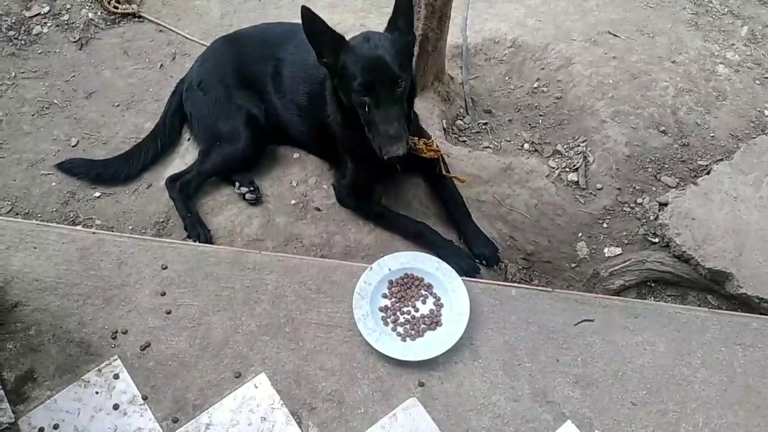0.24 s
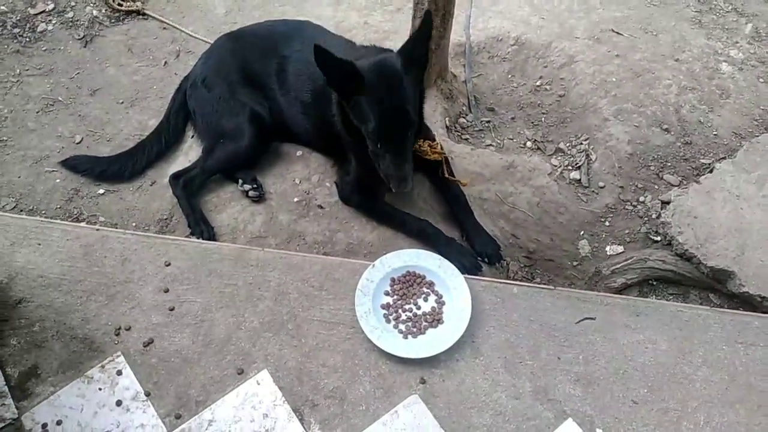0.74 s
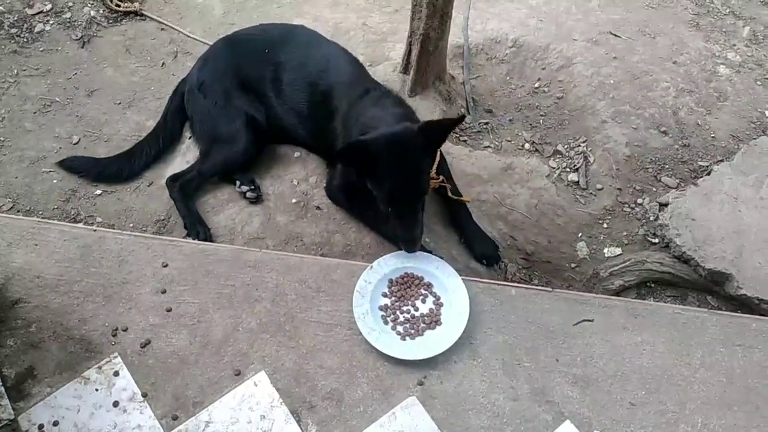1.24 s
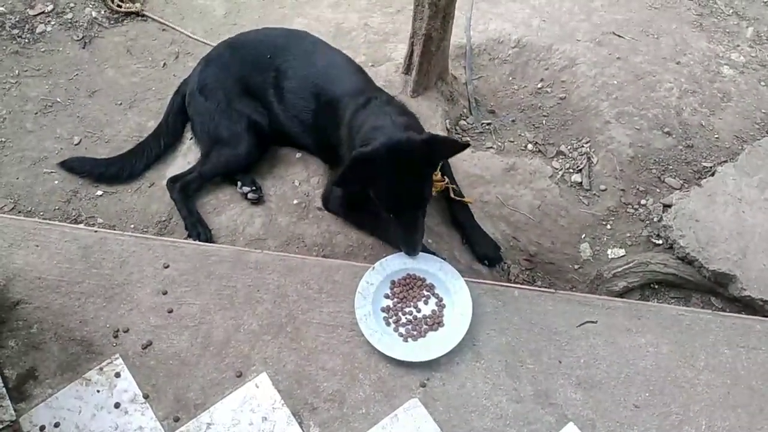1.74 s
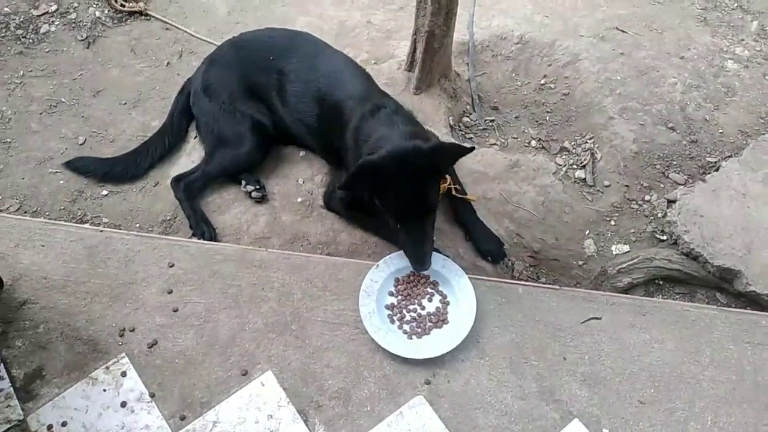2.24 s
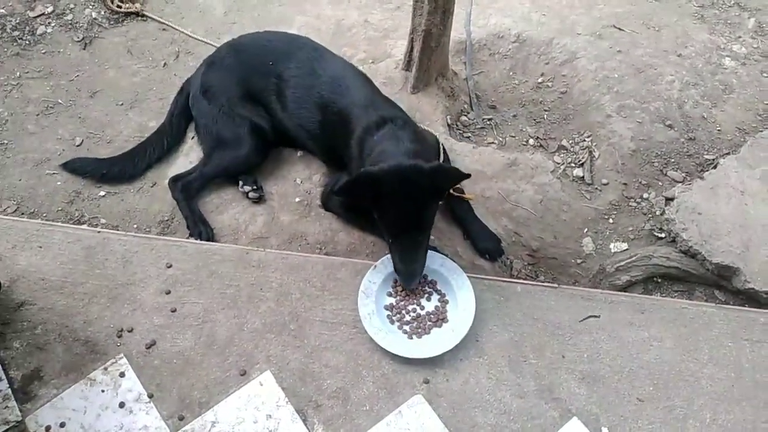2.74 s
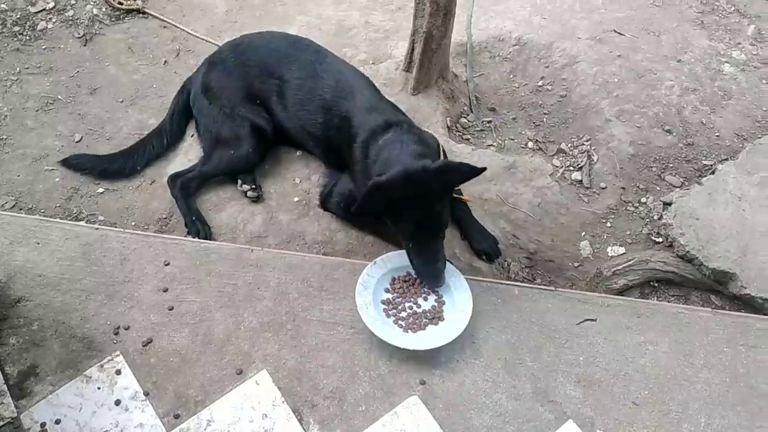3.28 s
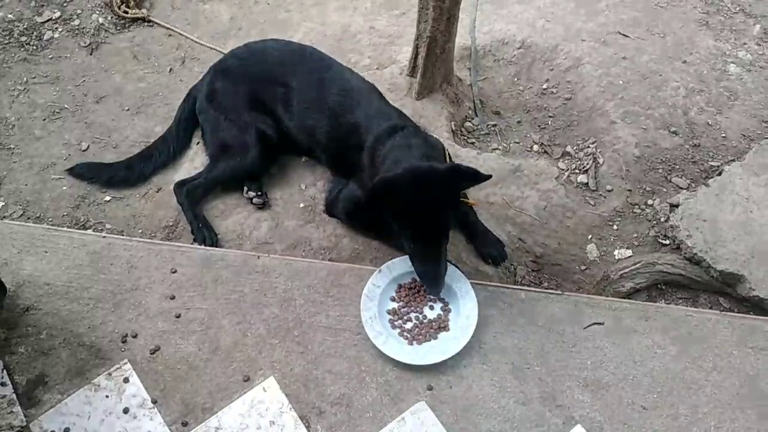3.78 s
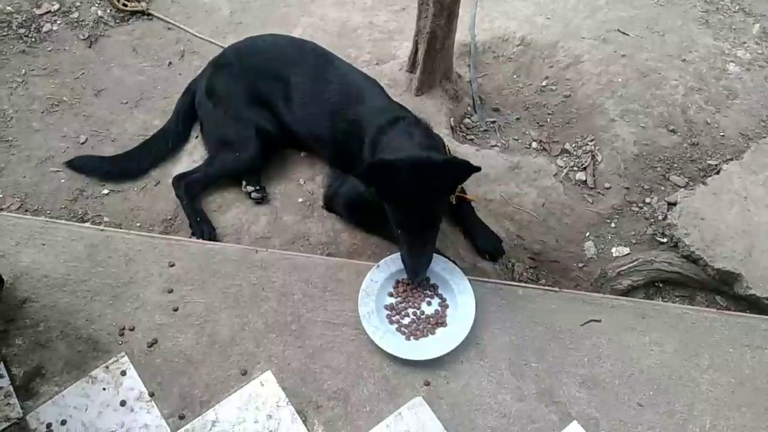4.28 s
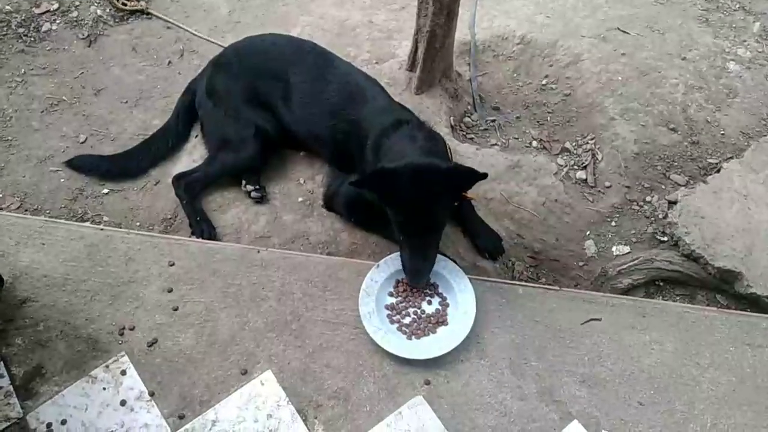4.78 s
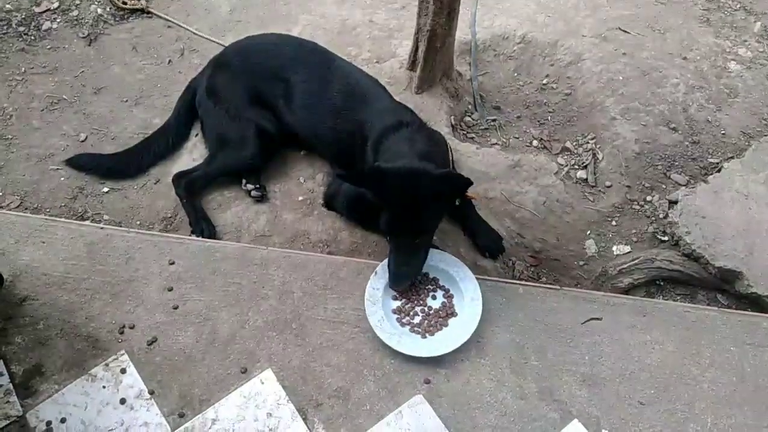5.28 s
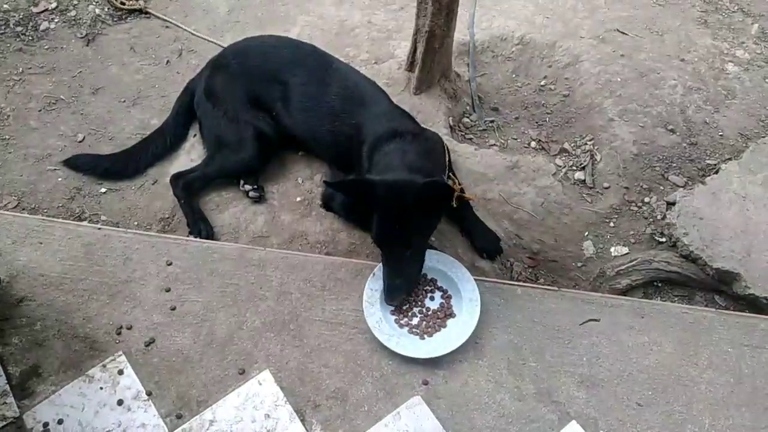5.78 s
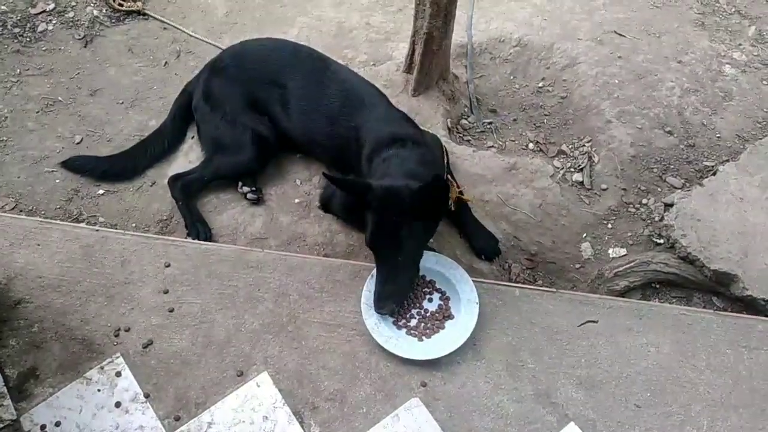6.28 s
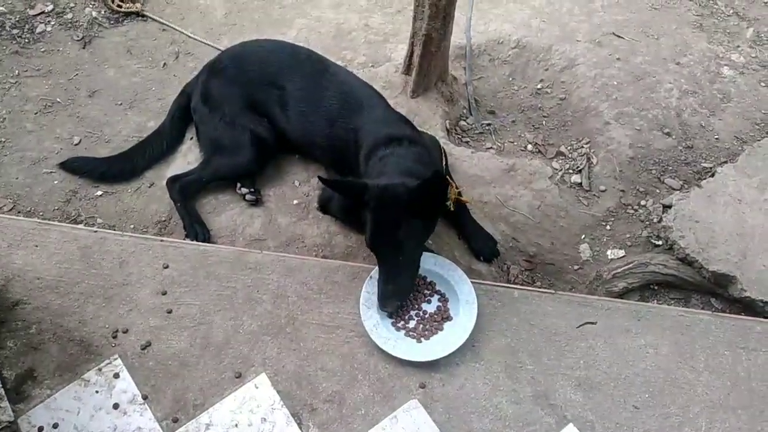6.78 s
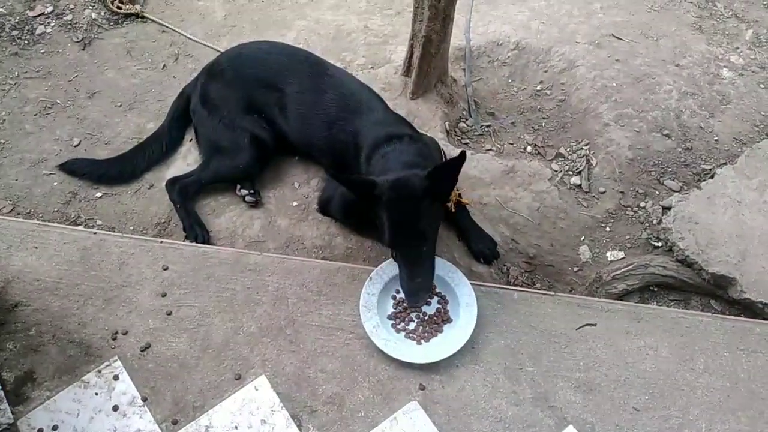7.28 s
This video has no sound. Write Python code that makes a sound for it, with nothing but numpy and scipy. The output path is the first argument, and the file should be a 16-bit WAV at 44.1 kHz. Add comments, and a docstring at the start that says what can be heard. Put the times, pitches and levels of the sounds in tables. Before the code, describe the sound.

A quiet outdoor porch with thin air hiss and soft, swelling low traffic rumble, heard in stereo from about two metres. From 0 to 2.5 s a dog makes faint sniffs and pellet rustles over a plate; a small steel clip tinkles very high at 0.5 s and several times between 1.7 and 2.3 s. Loud, brittle kibble crunches snap at 2.6, 2.9, 3.1 and 3.5 s, each a sharp crack with brief gritty crumbling and a short hard echo. A small bird gives quick rising-then-falling warbled chirps at 2.7, 2.95 and 3.9 s, fainter at 5.55. Soft nosing and light clinks fill 3.8 to 5 s. Another strong crack comes at 5.2 s, then weaker clicks around 5.4 and 6.1-6.3 s. Nosing grows busier from 6.6 s, with barely audible distant gliding tones around 6.8-7.0, and small crunchy ticks close the scene at 7.3-7.45 s.

```python
"""A dog cracks dry kibble off a plate on a concrete porch, two metres from a phone's two microphone ports.
Grain-like fractures ring jaw, mouth and plate; gentler grains make the sniffs and nosing of pellets.
Close by, a warbling whistle is a small bird and ringing steel modes are a clip on the lead.
Far off lie faint gliding tones and traffic rumble, under air hiss, both shaped from noise bands.
Dog and clip echo off the porch, the bird off the yard; the far tones carry a longer echo."""
import sys
import numpy as np
from scipy import signal
from scipy.fft import rfft, irfft
from scipy.io import wavfile
from scipy.ndimage import uniform_filter1d

SR = 44100
rng = np.random.default_rng(int(sys.argv[2]) if len(sys.argv) > 2 else 0)


def materialize(psi):
    """Save the field psi as 16-bit PCM at rate SR to the path in sys.argv[1].

    A 1-D psi becomes a single channel; in a 2-D psi each row is a channel.
    """
    bounded = np.clip(np.atleast_2d(psi).T, -1, 1)
    quanta = np.round(bounded * 32767).astype(np.int16)
    wavfile.write(sys.argv[1], SR, quanta)


N = 332073

# open air, spectrum of the hiss: f/Hz, density/dB (only its shape counts)
AIR_SPECTRUM = [(15, -46), (25, -1), (64, -1), (119, -19), (183, -24.5), (209, -29), (322, -19.5),
                (469, -30.5), (567, -31.5), (848, -34.5), (1660, -40.5), (2120, -37.5), (5730, -44),
                (10600, -36), (15500, -50)]
AIR_DB = -63
# far-off traffic: t/s, level/dB, upper hum re level/dB
TRAFFIC_LEVELS = [(0.0, -63.5, 10), (1.15, -51, -3), (1.76, -61.5, 6), (2.47, -54.5, -0.5),
                  (3.14, -58.5, 1.5), (4.0, -46, -6.5), (4.3, -52, -2.5), (5.0, -51.5, -1.5),
                  (5.2, -46, -13.5), (5.6, -56, 1), (5.93, -53.5, -1.5), (6.3, -52.5, -6), (6.7, -54, -1.5),
                  (7.53, -57.5, -1)]
RIGHT_LAG_S = .00025
# faint far-off tones: t/s, length/s, start f/Hz, end f/Hz, level/dB
FAR_TONES = [(0.06, 0.082, 1790, 1780, -69), (1.595, 0.58, 2690, 2680, -75),
             (1.847, 0.26, 4590, 4300, -70.5), (2.363, .1, 7350, 7200, -69),
             (5.517, 0.225, 4380, 4280, -73), (6.775, 0.032, 1000, 993, -64),
             (6.801, 0.051, 1382, 1456, -54.5), (7.042, 0.067, 676, 726, -59.5)]
OVERTONE_DB = -18

# sniffs or pushes of nose and tongue among the pellets: t/s, length/s, level at the end/dB, treble re level/dB
NOSINGS = [(0.16, 0.061, -74, 6), (0.27, 0.038, -68, -5), (0.98, 0.026, -65, -8), (1.24, 0.13, -61.5, 2.5),
           (1.82, 0.18, -57.5, -7.5), (2.12, 0.12, -67.5, 3), (2.33, 0.1, -59.5, -1.5),
           (3.23, 0.068, -54.5, -1), (3.4, 0.16, -56, -15), (3.84, 0.068, -67, 0), (4.2, 0.14, -62, -9),
           (4.62, 0.1, -62.5, -6), (4.94, 0.044, -62.5, 0.5), (5.02, 0.026, -60.5, 0),
           (5.18, 0.034, -58, 5), (5.79, 0.038, -62, -8), (5.9, 0.095, -58, -3.5), (6.12, 0.015, -54, -1.5),
           (6.57, 0.029, -60, 0), (6.65, 0.05, -50, -1.5), (6.74, 0.041, -56.5, -2),
           (6.94, 0.053, -55.5, -5), (7.06, 0.074, -52.5, -5.5), (7.2, 0.058, -49.5, -2.5)]
NOSE_SWELL_DB, NOSE_RELEASE_DB_PER_S = 7, 493.5
# air in the nostrils and pellets sliding on the plate, low group then treble group: f/Hz, width/Hz, level/dB
NOSE_RESONANCES = [
    [(1220, 1600, -18.5), (2250, 910, -1.5)],
    [(4370, 1300, -1), (6570, 4500, -2), (10000, 4600, -1.5)],
]
# pellets that snap or click: t/s, level/dB, then re level: treble/dB, jaw thud/dB, edge/dB
PELLET_SNAPS = [(1.0227, -61, 7.5, 14, -8), (2.6101, -19, -6, -7.5, -21), (2.629, -31, -20, -25, -7),
                (2.8665, -13.5, -5, -17.5, -11.5), (2.8925, -25.5, -12, -14, -17),
                (3.1254, -14.5, -4.5, -8.5, -11), (3.1486, -25.5, 0, -20, -20),
                (3.2953, -62.5, 14, -13, -10), (3.4214, -55, -10, -1, -9), (3.5233, -12, -2, -16, -12),
                (3.5793, -24, -11, -22, -19), (3.904, -58, -4, -7, 1), (5.043, -60.5, 5, -3, 15),
                (5.1922, -46, -12, -2, -21), (5.2082, -18, -8, -8.5, -16), (5.23, -34, -1, -25, -22),
                (5.25, -38, -11, -13, -2), (5.441, -33.5, -7, 2.5, -12), (6.129, -43, -14, 2, -19),
                (6.1654, -36.5, 5, -15, -11), (6.241, -46.5, -7, -16, -21), (6.3059, -46, -17, -19, -9),
                (6.3232, -40.5, -4, -20, 2.5), (6.9904, -56, 1, -6, -15), (7.2304, -53, -4, -9, -8),
                (7.3038, -31.5, -8.5, -6, -34), (7.3869, -42, 0, -20, -21), (7.403, -42, -17, -3, -18),
                (7.441, -41.5, -12, 2, -12), (7.449, -47.5, -15, -11, -11)]
SNAP_DB = 18.5  # force of a snap above its table level
MOUTH_HZ, KNOCK_DB, KNOCK_FADE_S = 1776, -9.5, 0.0018  # the mouth cavity that each snap knocks
# squeezes of the molars on the pieces: t/s, length/s, level/dB, then re level: treble/dB, jaw thud/dB
MOLAR_SQUEEZES = [(2.619, 0.012, -38, -1.5, -2), (2.881, 0.027, -25, -5.5, -13.5),
                  (3.131, 0.022, -26, -8, -12), (3.53, 0.016, -24, -9, -5.5), (3.56, .02, -25, -2.5, -15),
                  (5.222, 0.019, -30.5, -20, -8.5), (5.228, 0.0059, -32, 2, -15),
                  (5.441, 0.01, -41.5, -6, -5), (6.168, .012, -45.5, -0.5, -15),
                  (6.301, 0.059, -44.5, -7, -26), (7.304, 0.018, -43, -9, 0), (7.385, 0.01, -46.5, -5.5, 5),
                  (7.45, 0.036, -53.5, -9, 0)]
GRIND_ATTACK_S, GRIND_SAG_DB_PER_S, GRIND_RELEASE_DB_PER_S = 0.0018, 202, 694
GRIND_EDGE_DB = -15  # edge group re level
# jaw, mouth and plate, body resonances: f/Hz, width/Hz, level/dB
BODY_RESONANCES = [(1033, 41, -12.5), (1233, 100, -8.5), (1822, 175, -1), (2110, 740, -1.5),
                   (2370, 700, 1.5), (3760, 3900, -19.5)]
# jaw, mouth and plate, treble resonances: f/Hz, width/Hz, level/dB
TREBLE_RESONANCES = [(4490, 590, 4.5), (5580, 2050, -4), (5630, 980, -2), (7460, 1500, -11)]
# jaw thud, the low resonances: f/Hz, width/Hz, level/dB
JAW_RESONANCES = [(292, 140, -2), (630, 350, 0.5), (706, 134, 0)]
# edge of the crunch, the highest resonances: f/Hz, width/Hz, level/dB
EDGE_RESONANCES = [(8800, 1530, 5), (11100, 2200, 0), (13200, 2800, -6)]
# share of a grain that both ports hear alike, one value a group [ratio]: body, treble, jaw, edge
PORT_LIKENESS = [0.27, 0.14, 0.93, 0.35]
SHADOW_DB = -7.5  # the muzzle points down: the first sound is weaker than its bounce off the slab
# nearest porch surfaces: delay/s, level/dB, lag of left behind right/s
PORCH_BOUNCES = [(.002, 2.5, .00007), (.0075, -2.5, -.0001), (.011, -3.5, .00015), (0.0152, -5.5, -0.0042)]
PORCH_T60_S, PORCH_DB = 0.18, -1

# knocks of the lead clip: t/s, level/dB, all modes but the first re level/dB
CLIP_KNOCKS = [(0.525, -55.5, 1), (1.67, -40.5, -10), (2.0097, -41.5, -2.5), (2.149, -44, 1),
               (2.165, -41.5, -5), (2.343, -58.5, 1), (4.6, -44.5, -12), (4.9205, -56.5, -1),
               (5.032, -53, -3), (5.0434, -56, 3.5)]
STEEL_MODES = [(10310, 5, 0.04), (10900, -6, 0.3), (10300, 1.5, 0.33), (10700, 6.5, 0.061),
               (10930, -18, 0.12)]

# chirps of the bird: t/s, level/dB, pitch factor/1
BIRD_CALLS = [(2.713, -40.5, 1.01), (2.954, -37.5, 1.045), (3.933, -43, 1.01), (5.549, -54, 0.97)]
# course of one chirp: t after its start/s, f before the pitch factor/Hz, level/dB
CHIRP_COURSE = [(0, 5900, -15), (0.014, 6450, -14), (.019, 6650, -7), (0.028, 6700, -1), (0.032, 5900, -4),
                (0.044, 5220, -15), (.08, 4620, -16), (.11, 4250, -20.5), (0.14, 4300, -50),
                (0.158, 3900, -37)]
# pitch wobbles; the depths are before the pitch factor
WARBLE_HZ, WARBLE_DEPTH_HZ, WARBLE_LOW_S = 51.5, 486, .041
BUZZ_HZ, BUZZ_DEPTH_HZ = 220, 380
YARD_T60_S = 0.39

# response of the two microphone ports: f/Hz, left level/dB, right level/dB
PORT_RESPONSE = [(29.4, -4, -6), (305, 5, 4.5), (1284, 7, 6), (2780, -1, 2), (3730, 4, -3), (4380, 5, 0),
                 (6050, 6, -3), (7540, 9, -4.5), (8600, -5, -1.5), (10570, -8.5, 5), (12300, -13.5, -1.5),
                 (12000, 2, -7), (13500, -6, 1.5), (15200, 0, 0), (15960, -20, -10)]
TOP_HZ = 15900


def undb(db):
    """Decibels to an amplitude ratio."""
    return 10 ** (np.asarray(db) / 20)


def level(x, db):
    """Scale to an rms level."""
    return x * undb(db) / np.sqrt(np.mean(x ** 2))


def band(x, hz, width_hz):
    """One resonance, gain 1 at the centre."""
    return signal.lfilter(*signal.iirpeak(hz, hz / width_hz, SR), x)


def colour(x, hz, db):
    """Shape a spectrum by straight dB lines on a log-frequency axis."""
    f = np.maximum(np.arange(N // 2 + 1) * SR / N, 1)
    gain = undb(np.interp(np.log(f), np.log(hz), db))
    return irfft(rfft(x) * gain, N)


def walk(rate):
    """Random levels held 1 / rate s and slewed twice."""
    hold = int(SR / rate)
    steps = np.repeat(rng.standard_normal(N // hold + 1), hold)
    return 1.28 * uniform_filter1d(uniform_filter1d(steps, hold), hold)[:N]


def pair(x, y, alike_hz):
    """Left and right: alike towards the low end, unrelated well above alike_hz."""
    low = signal.sosfilt(signal.butter(1, alike_hz, fs=SR, output="sos"), y)
    return np.array([x + y - low, x - y + low])


def tail(x, t60_s, rise_s=0.0012, alike_hz=1500):
    """Diffuse echo: a fading noise response of unit mean energy a channel; the treble fades sooner."""
    t = np.arange(int(t60_s * SR)) / SR
    noise = pair(*rng.standard_normal((2, len(t))), alike_hz)
    low = signal.sosfilt(signal.butter(1, 3000, fs=SR, output="sos"), noise)
    treble = (noise - low) * 1000 ** (-.3 * t / t60_s)
    response = (low + treble) * 1000 ** (-t / t60_s) * (1 - np.exp(-t / rise_s))
    response /= np.sqrt(np.sum(response ** 2) / 2)
    return signal.oaconvolve(x[None], response, axes=1)[:, :N]


def rumble(hz, width_hz):
    """A narrow band of low noise, nearly the same at both ports."""
    def narrow(x):
        return level(band(band(x, hz, width_hz), hz, width_hz), -0.78)

    mid, side = (narrow(x) for x in rng.standard_normal((2, N)))
    return np.array([mid + 0.091 * side, mid - 0.065 * side])


def outdoors():
    """Smooth air hiss over two bands of traffic rumble; both bands swell and the lower one flickers."""
    hz, db = np.transpose(AIR_SPECTRUM)
    noise = pair(*rng.standard_normal((2, N)), 750)
    re_1khz_db = db - np.interp(1000, hz, db)
    hiss = colour(noise, hz, re_1khz_db) * undb(AIR_DB + 0.72 * walk(3.44))
    s, low_db, hum_db = np.transpose(TRAFFIC_LEVELS)
    t = np.arange(N) / SR
    low = rumble(66.0, 37) * undb(np.interp(t, s, low_db) + 0.43 * walk(9.7))
    hum = rumble(114.9, 55.2) * undb(np.interp(t, s, low_db + hum_db))
    left, right = hiss + low + hum
    return np.array([left, np.roll(right, int(RIGHT_LAG_S * SR))])  # it reaches the left port first


def far_tones():
    """Short wavering, gliding tones with a weak octave and an echo almost as strong as the direct sound."""
    out, waver, flutter = np.zeros(N), walk(30), walk(40)
    for s, length, start_hz, end_hz, db in FAR_TONES:
        i, n = int(s * SR), int(length * SR)
        pitch = np.linspace(start_hz, end_hz, n) * (1 + 0.015 * waver[i:i + n])
        phase = 2 * np.pi * np.cumsum(pitch) / SR
        tone = np.sin(phase) + undb(OVERTONE_DB) * np.sin(2 * phase)
        out[i:i + n] += undb(db + 2.1 * flutter[i:i + n]) * signal.windows.tukey(n, .7) * tone
    return undb(-2) * out + undb(-2.5) * tail(out, 0.82, 0.02)


def drives(rows, shape):
    """Gain of each resonance group: every row plays the shared shape/dB at its own time and strength."""
    t, out = np.arange(SR) / SR, np.zeros((len(rows[0]) - 2, N + SR))
    for s, length, db, *group_db in rows:
        i = int(s * SR)
        re_level_db = np.array([0, *group_db])[:, None]
        out[:, i:i + SR] += undb(db + re_level_db + shape(t, length))
    return uniform_filter1d(out[:, :N], size=130)  # 3 ms smoothing


def grains(rate, spread_db):
    """Tiny fractures at random moments, some larger, each radiating its own way to the two ports; unit power."""
    happens = rng.random(N) < rate / SR
    size = undb(spread_db * np.minimum(rng.exponential(size=N), 4)) * happens
    alike = np.array(PORT_LIKENESS)[:, None]
    mid, side = rng.standard_normal((2, 4, N))
    mid, side = mid * np.sqrt(1 + alike), side * np.sqrt(1 - alike)
    return level(size * np.array([mid + side, mid - side]), 0)


def ring(force, groups):
    """Every group of resonances rings from its own share of the force, with alternating signs."""
    return sum((-1) ** k * undb(db) * band(force[:, g], hz, width_hz)
               for g, group in enumerate(groups) for k, (hz, width_hz, db) in enumerate(group))


def sniff(t, length):
    """A steady swell that breaks off, in dB."""
    return NOSE_SWELL_DB * np.minimum(t / length - 1, 0) - NOSE_RELEASE_DB_PER_S * np.maximum(t - length, 0)


def nosing():
    """Breath and sliding pellets: swells of dense grains ring the nostrils and the plate."""
    force = drives(NOSINGS, sniff) * grains(4000, 2.2)[:, :2]  # grains per s, spread/dB
    return ring(force, NOSE_RESONANCES)


def snaps():
    """Each snap is a millisecond burst of fractures led by the strongest, and a short knock of the mouth cavity."""
    force, knock, t = np.zeros((4, N + SR)), np.zeros(N + SR), np.arange(440) / SR
    cavity = np.sin(2 * np.pi * MOUTH_HZ * t) * np.exp(-t / KNOCK_FADE_S)
    for s, db, *group_db in PELLET_SNAPS:
        burst = .2 * rng.standard_normal((4, len(t))) * np.exp(-t / .001)
        burst[:, 0] = [1, .6, 1, .3]  # leading fracture: body, treble, jaw, edge
        i = int(s * SR)
        re_level_db = np.array([0, *group_db])[:, None]
        force[:, i:i + len(t)] += undb(SNAP_DB + db + re_level_db) * burst
        knock[i:i + len(t)] += undb(db + KNOCK_DB) * cavity
    return force[:, :N], knock[:N]


def squeeze(t, length):
    """The jaw closes at once, sags while the pieces crumble, then lets go, in dB."""
    attack = 20 * np.log10(np.minimum(t / GRIND_ATTACK_S, 1) + 1e-3)
    sag = GRIND_SAG_DB_PER_S * np.minimum(t, length)
    release = GRIND_RELEASE_DB_PER_S * np.maximum(t - length, 0)
    return attack - sag - release


def grinding():
    """Crumbling pieces: a dense run of tiny fractures follows the force of each squeeze."""
    rows = [(*row, GRIND_EDGE_DB) for row in MOLAR_SQUEEZES]
    return drives(rows, squeeze) * grains(3500, 2.6)  # grains per s, spread/dB


def dog():
    """Nosing, snaps and grinding, heard directly, off the nearest surfaces and from the whole porch."""
    snap_force, knock = snaps()
    groups = (BODY_RESONANCES, TREBLE_RESONANCES, JAW_RESONANCES, EDGE_RESONANCES)
    direct = nosing() + ring(snap_force + grinding(), groups) + knock
    porch = tail(direct.mean(axis=0), PORCH_T60_S, .02, 3000)
    out = undb(SHADOW_DB) * direct + undb(PORCH_DB) * porch
    for s, db, lag in PORCH_BOUNCES:
        left = np.roll(direct[0], int((s + lag / 2) * SR))
        right = np.roll(direct[1], int((s - lag / 2) * SR))
        out += undb(db) * np.array([left, right])
    return out


def lead_clip():
    """A small steel clip: each knock rings a cluster of close modes with new strengths."""
    t, out = np.arange(SR // 4) / SR, np.zeros(N)
    for s, db, upper_db in CLIP_KNOCKS:
        chime = np.zeros(len(t))
        for k, (hz, mode_db, t60) in enumerate(STEEL_MODES):
            strength = undb(mode_db + 2.0 * rng.standard_normal() + upper_db * (k > 0))
            chime += strength * np.sin(2 * np.pi * hz * t) * 1000 ** (-t / t60)
        i = int(s * SR)
        out[i:i + len(t)] += undb(db) * chime * np.minimum(t / 0.00077, 1)
    return undb(-10.0) * out + undb(-11.0) * tail(out, PORCH_T60_S)


def bird():
    """A whistle that rises, then falls, with a fast warble and a weak octave, smeared by the yard."""
    s, hz, db = np.transpose(CHIRP_COURSE)
    t, out = np.arange(int(s[-1] * SR)) / SR, np.zeros(N)
    course_hz = np.interp(t, s, hz)
    warble = -np.cos(2 * np.pi * WARBLE_HZ * (t - WARBLE_LOW_S)) * np.clip((t - .025) / 0.012, 0, 1)
    # the rising start buzzes: a much faster wobble of the pitch that dies as the warble sets in
    buzz = np.sin(2 * np.pi * BUZZ_HZ * t) * np.clip((.032 - t) / .006, 0, 1)
    pitch = course_hz + WARBLE_DEPTH_HZ * warble + BUZZ_DEPTH_HZ * buzz
    octave = undb(-9) * np.clip(5300 / course_hz, 0, 1) ** 5  # weaker on the high notes
    for start, call_db, factor in BIRD_CALLS:
        phase = 2 * np.pi * np.cumsum(factor * pitch) / SR
        whistle = np.sin(phase) + octave * np.sin(2 * phase)
        i = int(start * SR)
        out[i:i + len(t)] += undb(call_db + np.interp(t, s, db)) * whistle
    out *= undb(1.3 * walk(360))  # the whistle is slightly hoarse
    return undb(-5) * out + undb(-1.5) * tail(out, YARD_T60_S, 0.011)


def scene():
    """All sources at the two ports, in order of appearance."""
    return outdoors() + far_tones() + dog() + lead_clip() + bird()


def record(dry):
    """Each microphone port has its own frequency response; the phone cuts the top."""
    hz, *sides = np.transpose(PORT_RESPONSE)
    heard = np.array([colour(x, hz, db) for x, db in zip(dry, sides)])
    return signal.sosfilt(signal.ellip(10, .2, 80, TOP_HZ, fs=SR, output="sos"), heard)


dry = scene()
out = record(dry)
materialize(out)
```